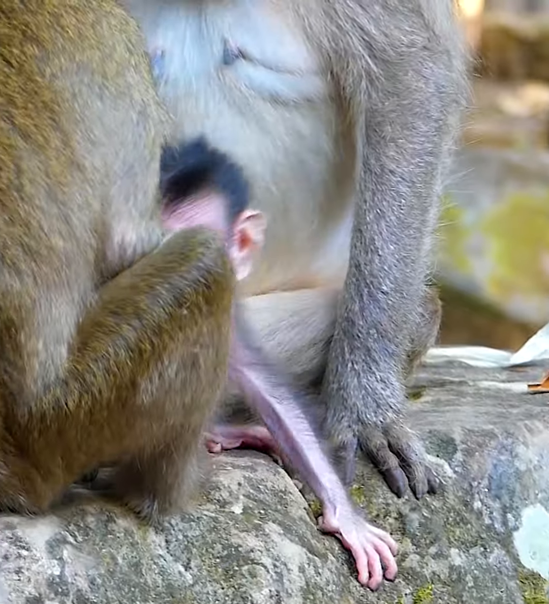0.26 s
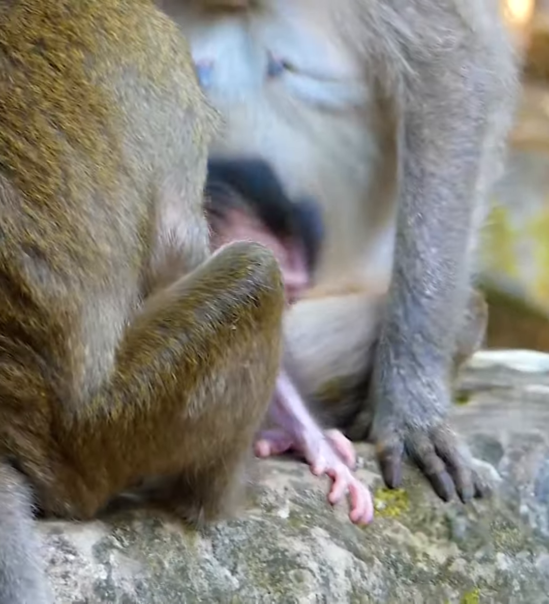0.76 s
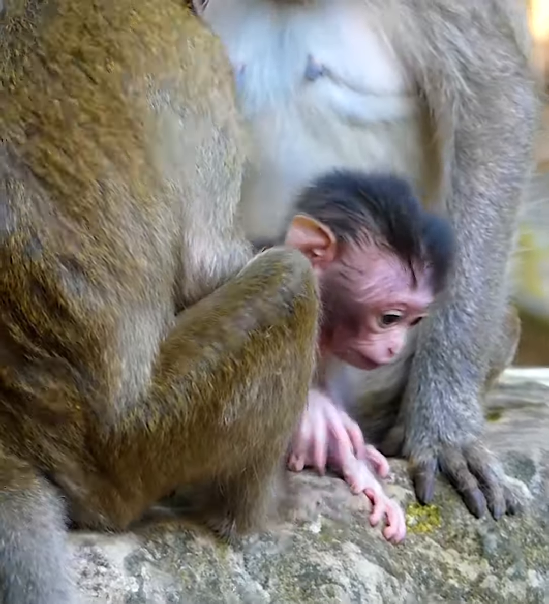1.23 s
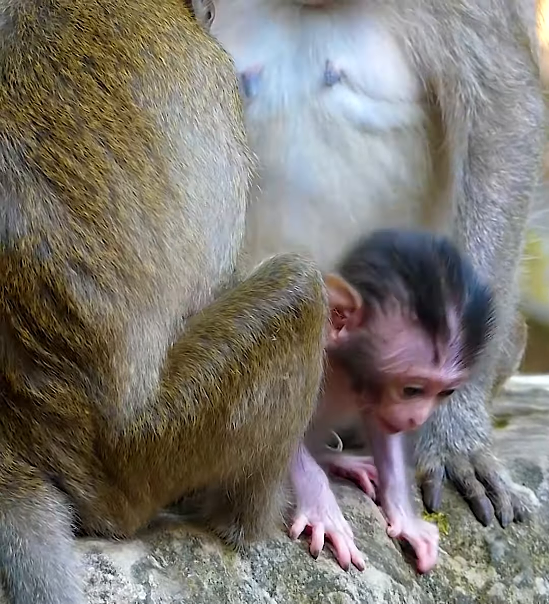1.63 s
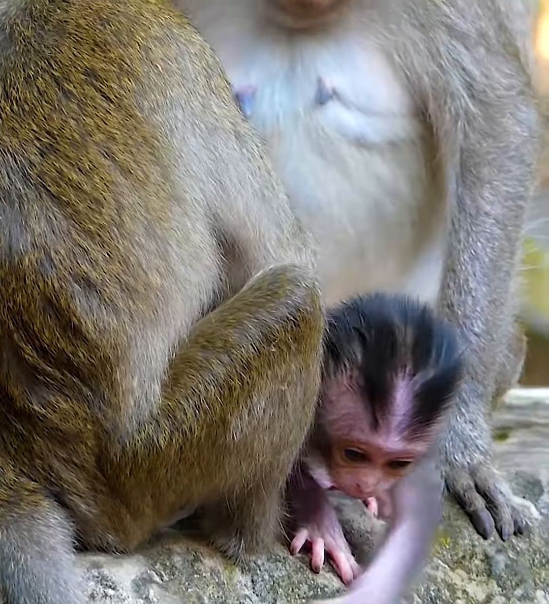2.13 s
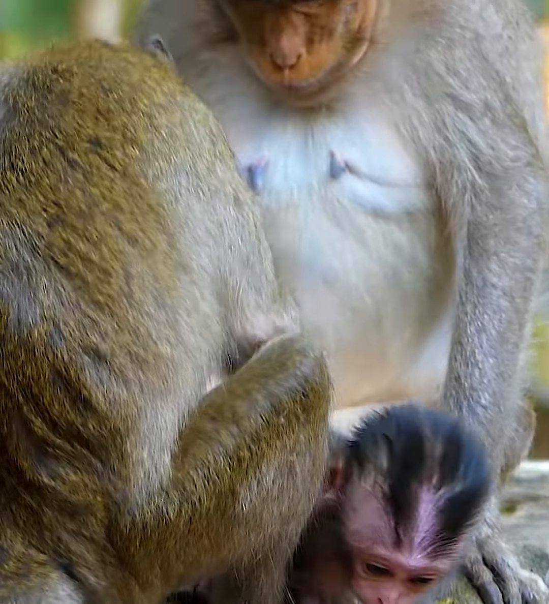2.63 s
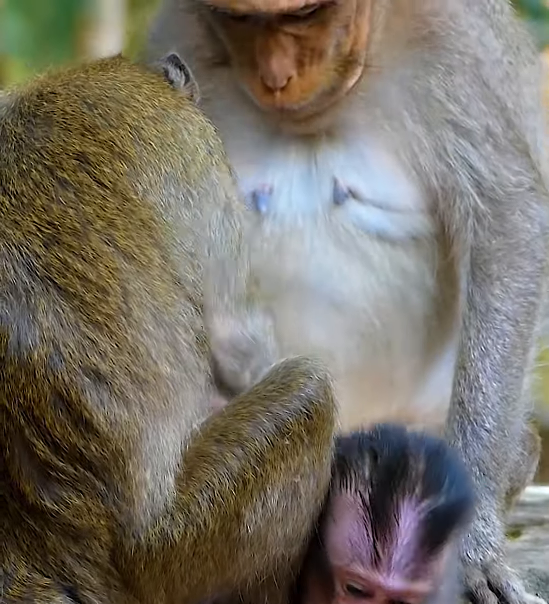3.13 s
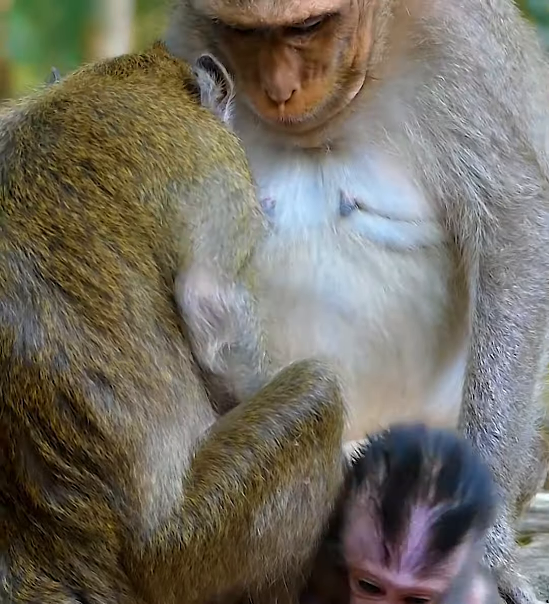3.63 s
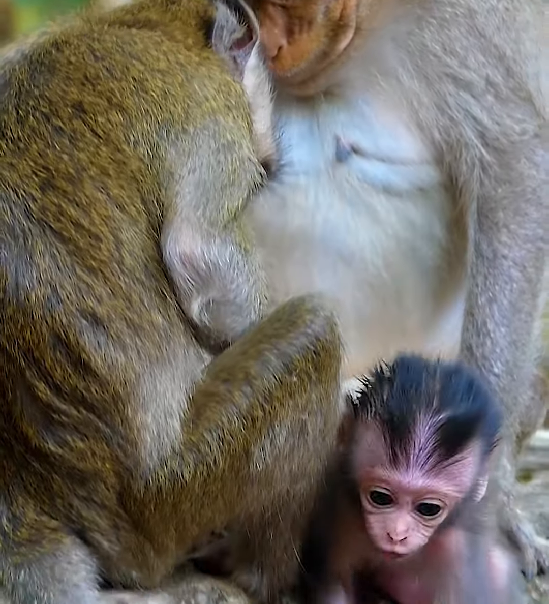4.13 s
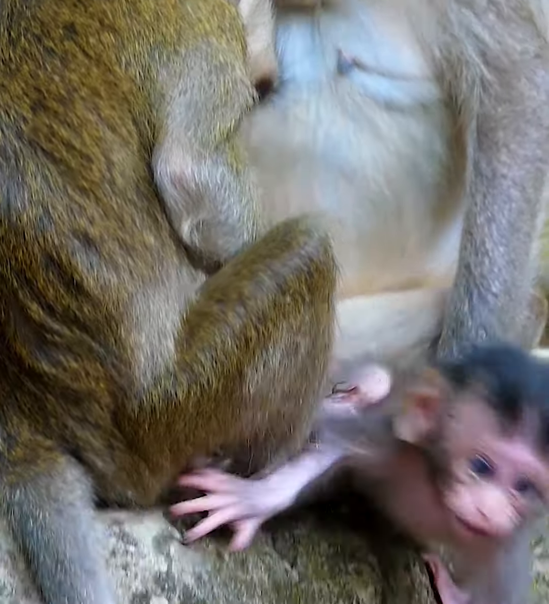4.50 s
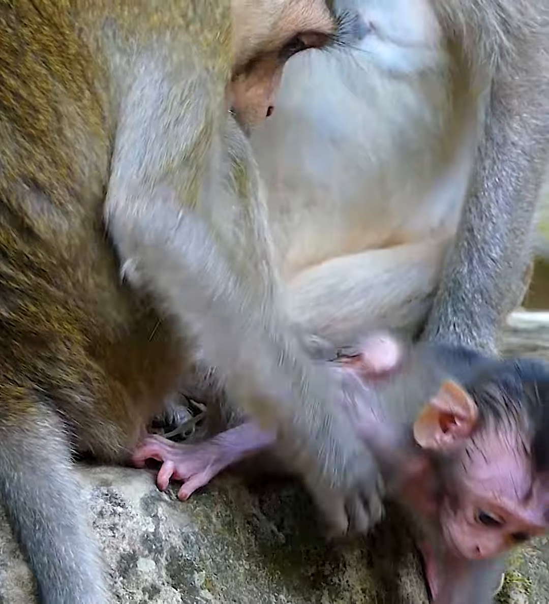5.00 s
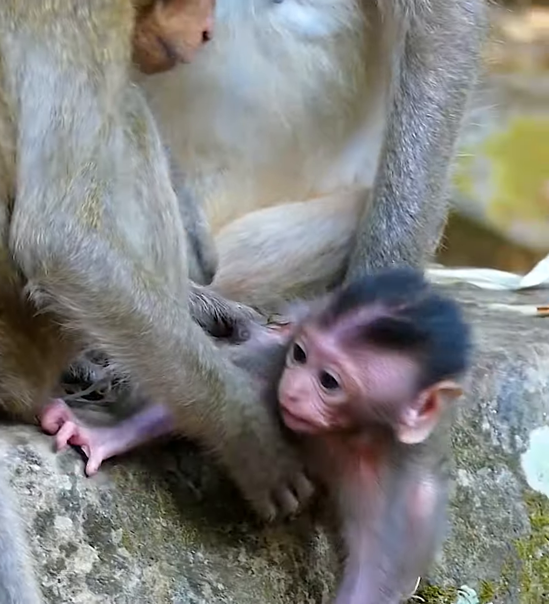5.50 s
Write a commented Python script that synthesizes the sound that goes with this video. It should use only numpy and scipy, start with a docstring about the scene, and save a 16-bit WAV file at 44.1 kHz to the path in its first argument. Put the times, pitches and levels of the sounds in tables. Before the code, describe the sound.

A loud, hoarse cicada whine throbs close by over a steadier second cicada and a blurred distant chorus. Soft monkey pats land irregularly on stone from the start. Past the midpoint the note clears, rises slightly and pumps with short rasping flares, while fur and feet scuff the ledge. A faint engine hums low in open woodland; one dim bird whistle comes late. Stereo outdoor pickup, contacts close but quiet.

```python
"""A near cicada opens with a hoarse, throbbing note over a steadier second cicada, a blurred chorus and open air.
From the start monkeys pat a stone ledge, now and then, while a distant engine idles beneath.
In the second half come brushing scuffs; the near note clears, rises and pumps, its clicks rasping in short flares.
Late on, one faint whistle of a bird passes. Cicadas are summed tones driven by rib clicks, the engine is exhaust
tones in a rumble, and contacts, air and chorus are shaped noise."""
import sys
import numpy as np
from scipy import signal
from scipy.fft import rfft, irfft, next_fast_len
from scipy.io import wavfile
from scipy.ndimage import uniform_filter1d, map_coordinates

SR = 44100
rng = np.random.default_rng(int(sys.argv[2]) if len(sys.argv) > 2 else 0)


def wrap_up_sound(samples):
    """Save the sound to the file named by the first command line argument, as 16-bit audio."""
    columns = np.atleast_2d(samples).T
    # keep every value between -1 and 1, then stretch to whole-number steps
    tamed = np.clip(columns, -1, 1)
    steps = np.round(tamed * 32767).astype(np.int16)
    wavfile.write(sys.argv[1], SR, steps)


N = 253575
TIME = np.arange(N) / SR  # s
TOP_HZ = 15720  # band limit of the whole scene

# Every half_length_s is the time from a bell's peak to 1/e of it.
# near cicada's note: time_s, pitch_hz
NEAR_PITCH = [(0, 2673), (2.9, 2687), (3.15, 2725), (3.58, 2735), (4.45, 2743), (5.75, 2763)]
# its hoarseness: time_s, hoarseness (0 clear, about 1 fully hoarse)
HOARSENESS = [(0, 1.03), (2.7, 0.96), (3.05, 0.82), (3.48, 0.77), (3.6, 0.12), (5.75, .05)]
# how hard it sings: time_s, fundamental_db, octave_db
SINGING_EFFORT = [(0, -33, -32), (2.6, -32.5, -31), (3.6, -31, -29.5), (4.0, -29.5, -31), (4.9, -31.5, -29),
                  (5.75, -28.5, -26.5)]
# its throb, quickening while hoarse, then settling: time_s, throbs_per_s
THROB_PACE = [(0, 6.52), (3.3, 7.88), (3.34, 7.04), (5.75, 7.04)]
# moments when the note falters: time_s, depth_db
NOTE_FALTERS = [(.371, 9), (.813, 27), (1.261, 9), (3.717, 9), (4.102, 4.5), (4.342, 10), (5.125, 1.5),
                (5.532, 7)]
# moments when it surges: time_s, lift_db
NOTE_SURGES = [(1.408, 6), (1.5, 4.5), (4.02, 6), (4.66, 5), (5.242, 8.5), (5.61, 1)]
# rasping flares of the clicks: time_s, half_length_s, lift_db
RASP_FLARES = [(3.29, 0.035, 6), (3.809, 0.034, 13), (4.379, 0.031, 14), (4.951, 0.042, 14),
               (5.495, 0.037, 13.5)]
# side tones, one row per harmonic, in click rates away from it and dB against it:
# two_below_db, one_below_db, one_above_db, two_above_db, three_above_db
SIDE_TONES = [(-26, -18.5, -18.5, -19, -26), (-18.5, -11, -11, -14.5, -30)]
# colour of the rib-click rattle: freq_hz, relative_line_db
RATTLE_COLOUR = [(6200, -7), (7400, -16), (7900, 9), (8300, 5.5), (8750, 5), (9400, -20), (10200, -1),
                 (10850, 0.5), (11400, -24), (12500, -19), (13600, -8), (15000, -36)]
# stereo offset of its harmonics: time_s, share of the full offset (0-1)
STEREO_OFFSET = [(0, 1), (4.3, 1), (5, .2), (5.75, .1)]
# far cicada: harmonic (number), level_db
FAR_HARMONICS = [(1, -46), (2, -46.5), (3, -49), (4, -57)]
# hands and feet on stone: start_s, level_db (before PAT_TRIM_DB), centre_hz, width_octaves
STONE_PATS = [(.066, -25, 3150, 1.1), (0.205, -31, 1100, 1.9), (0.436, -28, 1740, 1.4),
              (.52, -30.5, 1100, 1.4), (0.635, -29, 800, 1.8), (1.006, -26.5, 1010, 1.8),
              (1.28, -33.5, 360, 2.9), (1.522, -27.5, 376, 1.56), (2.132, -38, 320, 3.3),
              (2.309, -36.5, 380, 2.5), (2.721, -26, 1350, 0.48), (3.299, -32, 1300, 1.5),
              (3.353, -25.5, 1970, 2), (3.379, -29, 1400, 1.7), (3.92, -26, 2200, 2.2),
              (4.234, -26.5, 1660, 0.43), (4.644, -33, 420, 0.34), (5.568, -33, 1070, 0.99)]
# fur and feet brushing stone: time_s, half_length_s, brush_db, grit_db
STONE_SCUFFS = [(2.724, 0.025, -44, -36.5), (3.343, 0.041, -41, -43), (3.88, 0.27, -53.5, -57),
                (4.51, 0.088, -48, -41.5), (4.73, 0.13, -49, -45), (5.212, .04, -46, -44),
                (5.313, 0.089, -47.5, -41.5)]
# colour of the brushing: freq_hz, relative_db_per_hz
BRUSH_COLOUR = [(120, -36), (400, 5), (1250, 9.5), (2200, 9), (4000, -6.5), (9000, -38)]
# colour of the dragged grit: freq_hz, relative_db_per_hz
GRIT_COLOUR = [(1200, -14), (3000, 2.5), (7000, 1.5), (11000, -2.5), (15500, -10)]
# engine loudness: time_s, level_db
ENGINE_LEVEL = [(0, -50.5), (1.65, -50), (2, -48.5), (2.9, -46.5), (3.25, -50.5), (3.55, -45.5),
                (5.2, -44.5), (5.75, -46)]
# exhaust tones: multiple of the firing rate (number), relative_db
EXHAUST_TONES = [(4, -12.5), (5, -1), (6, 0.5), (7, -8), (8, -9.5)]
# colour of the engine's rumble: freq_hz, relative_db_per_hz
RUMBLE_COLOUR = [(25, -37), (45, -29), (70, -8), (105, -0.5), (145, -1), (190, -38.5), (300, -49),
                 (600, -66)]
# open air loudness: time_s, level_db
AIR_LEVEL = [(0, -43.5), (1, -43.5), (1.8, -44), (2.5, -45.5), (3.5, -43.5), (4.2, -43.5), (4.7, -42.5),
             (5.3, -42), (5.75, -43.5)]
# colour of the open air: freq_hz, relative_db_per_hz
AIR_COLOUR = [(30, -16.5), (150, 4.5), (300, -0.5), (600, -2), (1200, -4), (2200, -6.5), (4200, -7),
              (7000, -6), (10000, -10.5), (12000, -17), (15500, -20)]
# loudness of the distant chorus: time_s, level_db
CHORUS_LOUDNESS = [(0, -46), (3, -50), (5.75, -49)]
# colour of the distant chorus: freq_hz, relative_db_per_hz
CHORUS_COLOUR = [(2000, -36), (2450, 14), (2690, 23.5), (2950, -2), (3800, 3.5), (4700, -14), (5350, 22),
                 (6100, -13), (7200, -14), (8100, -25), (9400, -1), (10600, -9), (11700, -35), (13500, -25)]

THROB_DB, THROB_SHARP, STRAY_DB = 5.5, 2, 1.3  # trough depth, trough narrowness, chance swing
PUMP_PER_S, PUMP_TOP_S = 5.36, 3.73  # abdomen pumping: rate, time of one peak
PUMP_START_S, PUMP_BUILD_S = 3.3, 1.66  # when pumping sets in, how long it builds
PUMP_HZ, PUMP_DB = 14.1, 1.5  # its swing of pitch and of level, either way
FALTER_S, SURGE_S = 0.019, 0.033  # half lengths
FLARE_SAG_DB, FLARE_SAG_S = 6, 0.057  # the octave gives way around each flare: depth, half length
BUZZ_HZ, BUZZ_DRIFT_HZ, BUZZ_DB = 110.3, 28.1, 3  # flutter: rate, drift, depth at hoarseness 1
SIDE_FADE_DB = 4.5  # how much weaker the side tones are at hoarseness 1
RATTLE_STRAY_DB = 0.8  # chance swing of the rattle's level
PAT_T60_S, PAT_T60_SLOPE = 0.046, 0.64  # decay at 1 kHz; duller pats last longer
PAT_TRIM_DB = -4.0  # applied to every pat
SLAP_DB, SLAP_T60_S, SLAP_TOP_HZ = -3.5, 0.011, 2200  # slap: level against the puff, decay, band top


def amp(db):
    """Decibels to amplitude."""
    return 10 ** (np.asarray(db) / 20)


def unit(x):
    """x scaled to rms 1."""
    return x / np.sqrt(np.mean(x ** 2) + 1e-20)


def curve(rows):
    """(time_s, value) rows joined by straight lines."""
    return np.interp(TIME, *np.transpose(rows))


def wobble(rate):
    """A smooth random curve with rate knots a second."""
    return map_coordinates(rng.standard_normal(int(N * rate / SR) + 4), [TIME * rate])


def swell(s, half):
    """A bell-shaped rise and fall around time s."""
    return np.exp(-((TIME - s) / half) ** 2)


def filtered(x, response):
    """x shaped by a response of frequency."""
    size = next_fast_len(N + 8192)
    hz = np.fft.rfftfreq(size, 1 / SR)
    return irfft(rfft(x, size) * response(hz), size)[..., :N]


def stereo(mid, side, width):
    """Left and right from mid and side; width scales the side."""
    return np.array([mid + width * side, mid - width * side])


def noise(spectrum, width):
    """Coloured stereo noise of rms 1."""
    f, db = np.transpose(spectrum)
    white = rng.standard_normal((2, N))
    mid, side = filtered(white, lambda hz: amp(np.interp(np.log(hz + 1), np.log(f), db)))
    return unit(stereo(mid, side, width))


def trees(x, wet_db, t60, width):
    """Trunks and leaves scatter a sound into a decaying tail, a little different at each ear."""
    t = np.arange(SR // 3) / SR
    mid, side = rng.standard_normal((2, len(t))) * amp(-60 * t / t60)
    tail = stereo(mid, side, width)
    tail = tail / np.linalg.norm(tail[0])
    return x + amp(wet_db) * signal.fftconvolve(x[None], tail, axes=1)[:, :N]


def even(x):
    """x with its slow level held at rms 1; fast flutter stays."""
    power = np.mean(x ** 2, 0)
    for _ in range(2):
        power = uniform_filter1d(power, size=1800)
    return x / np.sqrt(np.abs(power) + 1e-9)


def near_cicada():
    """Rib clicks, one every ten cycles, keep the abdomen ringing; uneven clicks make the note hoarse."""
    hoarse = curve(HOARSENESS)
    low_db, high_db = throb()
    slips = np.tanh(wobble(450) ** 2 / 2) - 0.3  # the note keeps slipping briefly flat
    roughness_hz = 30 * wobble(560) - 130 * slips + 10 * wobble(60)
    pitch = curve(NEAR_PITCH) + PUMP_HZ * pump() + 4 * wobble(30) + hoarse * roughness_hz
    phase = 2 * np.pi * np.cumsum(pitch) / SR
    click = phase / 10
    uneven_click = click + 0.75 * hoarse * wobble(110)
    buzz_hz = BUZZ_HZ + BUZZ_DRIFT_HZ * wobble(25)
    buzz_db = BUZZ_DB * np.sin(2 * np.pi * np.cumsum(buzz_hz) / SR)
    # hoarse notes are brighter
    treble_db = 0.2 * (high_db - np.mean(high_db)) + 10 * hoarse + 2.55 * wobble(23.95)
    levels = [low_db, high_db, -57.5 + treble_db, -63 + treble_db]
    pans = [-2.14, 0.097, -0.93, -1.6]  # dB added on the left, taken off on the right
    out = np.zeros((2, N))
    for k, (db, pan_db) in enumerate(zip(levels, pans), 1):
        flutter = amp(hoarse * (2.76 * wobble(260) + buzz_db))
        tone = even(trees(np.sin(k * phase) * flutter, wet_db=-3.0, t60=0.12, width=0.23))
        if k <= len(SIDE_TONES):
            sides = side_tones(k * phase, uneven_click, SIDE_TONES[k - 1], db, hoarse)
            tone = tone + sides * flutter
        out += tone * amp(db + np.outer([pan_db, -pan_db], curve(STEREO_OFFSET)))
    return out + rattle(click, hoarse)


def throb():
    """Level in dB of fundamental and octave: effort, a quick throb, slow pumping, falters and surges."""
    s, low_db, high_db = np.transpose(SINGING_EFFORT)
    throb_phase = np.pi * np.cumsum(curve(THROB_PACE)) / SR
    trough = np.abs(np.sin(throb_phase)) ** (2 * THROB_SHARP)
    falters = sum(db * swell(at, FALTER_S) for at, db in NOTE_FALTERS)
    surges = sum(db * swell(at, SURGE_S) for at, db in NOTE_SURGES)
    shared = PUMP_DB * pump() - THROB_DB * trough - falters + surges
    sag = FLARE_SAG_DB * sum(swell(at, FLARE_SAG_S) for at, _, _ in RASP_FLARES)
    low = np.interp(TIME, s, low_db) + shared + STRAY_DB * wobble(24.07)
    high = np.interp(TIME, s, high_db) + shared + STRAY_DB * wobble(24.07)
    return low, high - sag


def pump():
    """The abdomen's slow in-and-out, -1 to 1, which builds up as the note clears."""
    depth = np.clip((TIME - PUMP_START_S) / PUMP_BUILD_S, 0, 1)
    return depth * np.cos(2 * np.pi * PUMP_PER_S * (TIME - PUMP_TOP_S))


def side_tones(phase, click, sides, db, hoarse):
    """A harmonic's side tones, steadier than its throb, standing out as the note clears."""
    side = sum(amp(level) * np.sin(phase + j * click) for j, level in zip((-2, -1, 1, 2, 3), sides))
    steadying_db = -0.7 * (db - np.mean(db))  # undoes most of the harmonic's own swing
    return np.sqrt(2) * side * amp(steadying_db - SIDE_FADE_DB * hoarse + 1.6 * wobble(16))


def rattle(click, hoarse):
    """The bare clicks: a thin comb of high lines at multiples of the click rate, rasping in flares."""
    hz, db = np.transpose(RATTLE_COLOUR)
    click_hz = np.mean(curve(NEAR_PITCH)) / 10
    comb = np.zeros(N)
    for k in np.arange(np.ceil(hz[0] / click_hz), hz[-1] / click_hz):
        line_amp = amp(np.interp(k * click_hz, hz, db))
        comb += line_amp * np.sin(k * click + rng.uniform(0, 2 * np.pi))
    flare_db = sum(lift * swell(s, half) for s, half, lift in RASP_FLARES)
    level_db = -48.5 - 3.2 * hoarse + flare_db + RATTLE_STRAY_DB * wobble(18)
    return even(trees(comb, wet_db=-1.5, t60=0.099, width=0.48)) * amp(level_db)


def far_cicada(pitch_hz):
    """A second cicada holds its note, blurred by the trees."""
    phase = 2 * np.pi * np.cumsum(pitch_hz + 3 * wobble(5.4) + 7 * wobble(300)) / SR
    click = phase / 10
    phase = phase + 0.094 * np.sin(click) + 0.088 * np.sin(2 * click)  # its rib clicks bend the note
    out = np.zeros((2, N))
    for k, db in FAR_HARMONICS:
        note = trees(np.sin(round(k) * phase), wet_db=2, t60=0.52, width=0.25)
        out += amp(db + 3.8 * wobble(14)) * even(note)
    return out


def pats():
    """Soft contacts with stone: a tiny slap and a dull puff of noise that dies quickly."""
    out = np.zeros((2, N))
    t = np.arange(SR // 4) / SR
    attack = 1 - np.exp(-t / 0.00054)
    slap_filter = signal.butter(2, SLAP_TOP_HZ, fs=SR)
    for s, db, hz, octaves in STONE_PATS:
        t60 = PAT_T60_S * (1000 / hz) ** PAT_T60_SLOPE
        half_band = 2 ** (octaves / 2)
        band = signal.butter(2, [hz / half_band, min(hz * half_band, SR / 3)], "bandpass", fs=SR)
        puff = unit(signal.lfilter(*band, rng.standard_normal((2, len(t))))) * amp(-60 * t / t60)
        slap = unit(signal.lfilter(*slap_filter, rng.standard_normal((2, len(t)))))
        slap = slap * amp(SLAP_DB - 60 * t / SLAP_T60_S)
        mid, side = (puff + slap) * amp(db + PAT_TRIM_DB) * attack
        start = round(s * SR)
        out[:, start:start + len(t)] += stereo(mid, side, 0.5)[:, :N - start]
    return out


def scuffs():
    """Brushing strokes catch unevenly on the stone and drag fine grit along."""
    brush = sum(amp(db) * swell(s, half) for s, half, db, _ in STONE_SCUFFS)
    grit = sum(amp(db) * swell(s, half) for s, half, _, db in STONE_SCUFFS)
    catch = unit(amp(2.8 * wobble(130) + 1.05 * wobble(900)))
    return catch * (brush * noise(BRUSH_COLOUR, width=0.17) + grit * noise(GRIT_COLOUR, width=0.38))


def engine(firing_hz):
    """A far engine: multiples of its firing rate firm up and recede within a low rumble."""
    phase = 2 * np.pi * np.cumsum(firing_hz + 0.12 * wobble(3.11)) / SR
    tones = np.zeros(N)
    for k, db in EXHAUST_TONES:
        tones += amp(db + 1.46 * wobble(4.274)) * np.sin(round(k) * phase + 0.63 * wobble(1.7))
    # the tones' share of the power: (time_s, share)
    share = curve([(0, 0.29), (1.5, 0.14), (2, 0.72), (3.2, 0.29), (3.7, 0.65), (5.75, 0.87)])
    rumble = noise(RUMBLE_COLOUR, width=0.39)
    return amp(curve(ENGINE_LEVEL)) * (np.sqrt(share) * unit(tones) + np.sqrt(1 - share) * rumble)


def bird(s, half, hz, db):
    """One faint whistle from far away: a sine that barely wavers in pitch."""
    return amp(db) * swell(s, half) * np.sin(2 * np.pi * np.cumsum(hz + 6 * wobble(29.96)) / SR)


def wood():
    """Open air and the blur of many distant cicadas, which thins out later, both as coloured noise."""
    stir_db = 0.7 * wobble(4) + 0.6 * wobble(15)
    air = amp(curve(AIR_LEVEL) + stir_db) * noise(AIR_COLOUR, width=0.87)
    chorus = amp(curve(CHORUS_LOUDNESS) + 1.9 * wobble(16)) * noise(CHORUS_COLOUR, width=0.2)
    return air + chorus


def scene():
    """Cicadas in front, contacts on stone close by, then engine, bird and wood."""
    insects = near_cicada() + far_cicada(pitch_hz=2724.0)
    contacts = pats() + scuffs()
    whistle = bird(s=4.79, half=0.06, hz=1210, db=-48)
    return insects + contacts + engine(firing_hz=22.1) + whistle + wood()


def record(dry):
    """Nothing is kept above the band limit."""
    return filtered(dry, lambda hz: hz < TOP_HZ)


dry = scene()
out = record(dry)
wrap_up_sound(out)
```